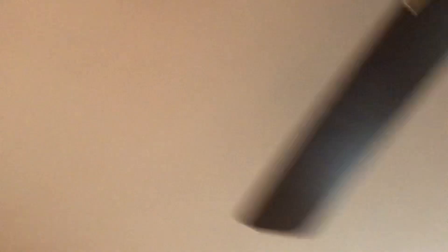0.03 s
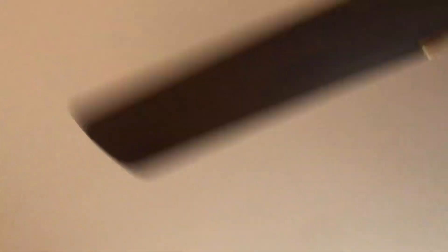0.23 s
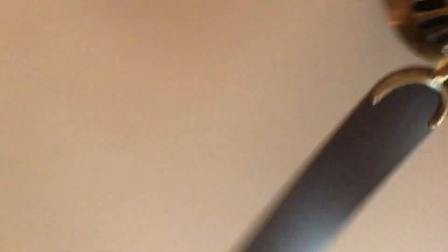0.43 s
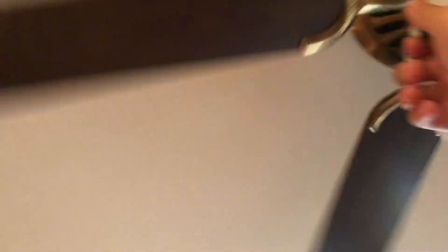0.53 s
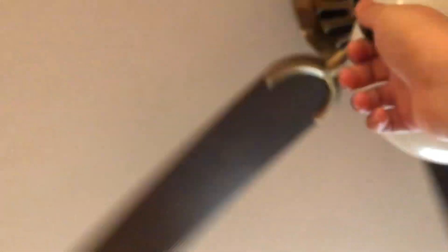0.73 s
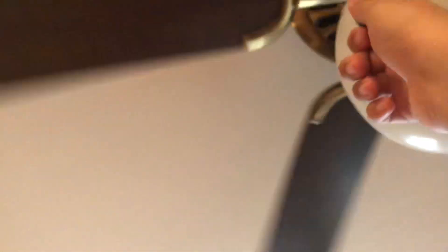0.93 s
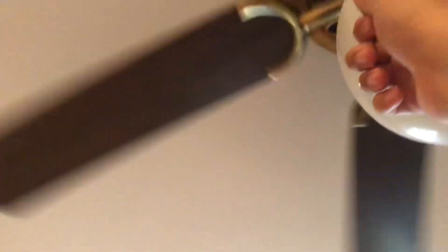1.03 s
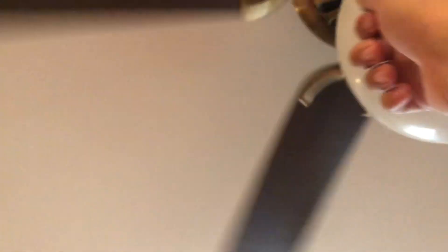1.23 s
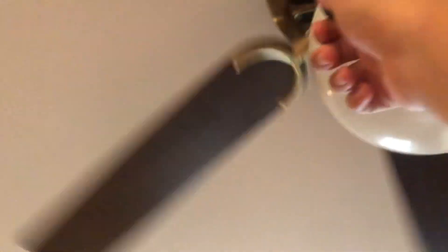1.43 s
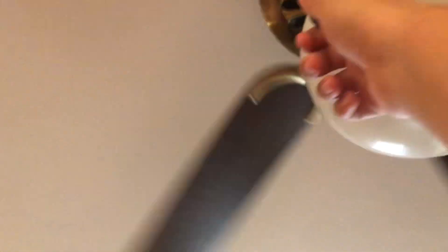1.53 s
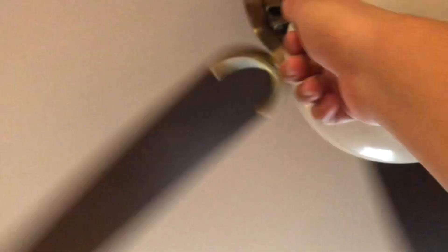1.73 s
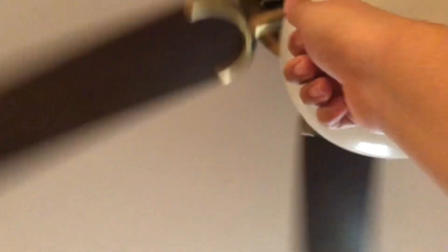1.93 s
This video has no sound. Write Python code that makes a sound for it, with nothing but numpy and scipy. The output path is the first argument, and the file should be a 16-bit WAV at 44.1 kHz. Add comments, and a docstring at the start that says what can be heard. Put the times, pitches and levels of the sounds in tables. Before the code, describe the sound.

Sharp, uneven clicks and ticks from a ceiling fan's glass shade, with a low hum.

```python
"""A small room: a ceiling fan turns while a hand holds its glass light bowl.
The bowl shifts in its metal fitting: sharp, chattering clicks ring glass and housing,
with light ticks and brief scrapes between them, each with a short room tail.
The motor hums over a low rush of air."""
import sys
import numpy as np
from scipy import signal
from scipy.fft import rfft, irfft, next_fast_len
from scipy.io import wavfile
from scipy.ndimage import map_coordinates

SR = 44100
rng = np.random.default_rng(int(sys.argv[2]) if len(sys.argv) > 2 else 0)


def int16_out(signal):
    """Quantize to a 16-bit WAV file."""
    q = np.round(np.clip(np.atleast_2d(signal).T, -1, 1) * 32767)
    wavfile.write(sys.argv[1], SR, q.astype(np.int16))


N = 88200

# Bowl slips: t/s, chatter/s, contact f/Hz, contact level/dB re snap, 8 x relative band energy/dB
BOWL_SLIPS = [(0.246, 0.0013, 8080, -3.5, -61.5, -71, -67, -62, -57.5, -64, -61.5, -60),
              (0.4716, 0.0021, 9480, -10.5, -72.5, -79, -75, -68, -70.5, -65.5, -72, -65.5),
              (0.6014, 0.0024, 2070, -5.5, -62.5, -66.5, -52.5, -55, -55.5, -59.5, -62.5, -65.5),
              (1.0684, 0.0005, 7320, -8.5, -69.5, -77.5, -69.5, -67.5, -64, -68.5, -67.5, -70),
              (1.3708, 0.0045, 14600, -11, -71, -74, -76.5, -68, -73, -64.5, -70.5, -61),
              (1.5804, 0.0032, 6700, -23, -60.5, -67, -62.5, -58.5, -57.5, -58, -64, -64)]
def clicks(gain_db=-3, contact_t60_s=0.016):
    """The bowl slips in its fitting; each point of contact has a brief pitch of its own."""
    out = np.zeros(N)
    for start_s, chatter_s, hz, contact_db, *band_db in BOWL_SLIPS:
        click = snap(band_db, chatter_s)
        contact = pulse(np.sin(2 * np.pi * hz * T) * ATTACK * amp(-60 * T / contact_t60_s))
        contact = in_room(contact, send=0.3)
        add(out, start_s, click + amp(contact_db) * np.linalg.norm(click) * contact)
    return amp(gain_db) * out


# Light contacts: t/s, room send/dB, 8 x relative band energy/dB
LIGHT_CONTACTS = [ (.059, 0, -82, -88, -86, -80, -83, -79, -77, -78),
                  (.128, -3, -91, -80, -93, -99, -96, -95, -98, -99),
                  (.173, 0, -81, -89, -83, -82, -85, -88, -92, -89),
                  (.395, -3, -95, -86, -90, -100, -98, -98, -102, -105),
                  (.535, 0, -85, -84, -85, -79, -76, -75, -81, -78),
                  (.821, 0, -90, -93, -90, -85, -90, -91, -89, -86),
                  (.849, 0, -76, -86, -81, -76, -80, -76, -75, -75),
                  (.947, 0, -76, -88, -80, -77, -79, -75, -75, -71),
                  (1.004, -3, -89, -81, -96, -105, -104, -101, -103, -99),
                  (1.1517, -7, -86, -75, -74, -95, -93, -88, -92, -93),
                  (1.338, 0, -80, -79, -88, -85, -87, -95, -99, -97),
                  (1.422, 0, -83, -85, -85, -78, -78, -74, -80, -73),
                  (1.834, 0, -76, -82, -84, -79, -83, -77, -76, -77),
                  (1.9275, 0, -77, -82, -78, -83, -79, -75, -78, -73)]
def ticks(gain_db=-2):
    """Lighter contacts of bowl and fitting."""
    out = np.zeros(N)
    for start_s, send_db, *band_db in LIGHT_CONTACTS:
        add(out, start_s, snap(band_db, chatter_s=0.0014, send_db=send_db))
    return amp(gain_db) * out


# Modes of glass bowl with fitting, and of housing: f/Hz, relative level/dB, T60/s
BOWL_MODES = [(1035, -14, .4), (1567, -8, .18), (2051, -4, .17), (2700, -5, .16), (2864, -2, .18),
              (3295, -4, .16), (3424, -5, .15), (3591, -2, .15), (3790, -3, .13), (4829, -8, .13),
              (5500, -6, .11), (6900, -7, .11), (8140, -6, .07), (10050, -11, .1), (14600, -9, .08)]
HOUSING_MODES = [(253, -2, .14), (343, 1, .19), (385, -6, .08), (432, -2, .15), (590, -17, .13)]
# Room tail EQ: f/Hz, gain/dB
TAIL_EQ = [(200, -14), (1000, 1), (3000, -1), (8000, -1), (15000, 0)]
# Edges of the 8 bands: f/Hz
BAND_EDGES_HZ = [200, 700, 1700, 3100, 4200, 7000, 11000, 13500, 16000]
def snap(band_db, chatter_s, send_db=0, uneven_db=4, release_t60_s=0.013, housing_rise_s=0.005):
    """Chattering contact rings bowl and housing; the room answers in the bowl's colour."""
    slips = rng.standard_normal(len(T)) * amp(uneven_db * rng.standard_normal(len(T)))
    release = amp(-60 * np.maximum(T - chatter_s, 0) / release_t60_s)
    chatter = pulse(slips * ATTACK * release)
    bowl = amp(-10.5) * pulse(ring(BOWL_MODES) * ATTACK)
    housing = amp(11.5) * pulse(ring(HOUSING_MODES) * (1 - np.exp(-T / housing_rise_s)))
    direct = in_bands(chatter + bowl + housing, band_db)
    tail_db = band_db + along(TAIL_EQ, np.array(BAND_EDGES_HZ[1:]))
    tail = in_bands(filtered(room_tail(), bowl_response), tail_db)
    return direct + amp(ROOM_DB + send_db) * tail


def bowl_response(f, lift=2.6, relative_width=0.017):
    """Gain at f: one resonance peak per bowl mode."""
    return 1 + lift * sum(amp(db) / (1 + ((f / hz - 1) / relative_width) ** 2)
                          for hz, db, _ in BOWL_MODES)


def ring(modes, scatter_db=1.5, rattle_per_s=161.5):
    """Decaying modes, struck differently each time; the loose seat roughens their phase."""
    t = T[:SR // 4]
    out = np.zeros(len(T))
    for hz, db, t60_s in modes:
        decay = amp(db + rng.normal(0, scatter_db) - 60 * t / t60_s)
        phase = 2 * np.pi * (hz * t + rng.random())
        rattle_rad = 0.63 * np.sqrt(hz / 3000) * wobble(rattle_per_s, len(t))
        out[:len(t)] += decay * np.sin(phase + rattle_rad)
    return out


# Rim strokes: t/s, length/s, level/dB
RIM_STROKES = [(0.016, 0.041, -54), (0.122, 0.077, -64), (0.152, .035, -58), (.226, 0.025, -61.5),
               (0.437, 0.06, -64.5), (.52, 0.045, -64), (0.801, 0.036, -63), (0.93, 0.024, -53.5),
               (0.962, 0.011, -67), (1.055, 0.055, -53), (1.33, 0.072, -62), (1.41, .025, -58.5),
               (1.799, 0.027, -59), (1.854, 0.14, -64), (1.915, 0.024, -54.5)]
# Friction spectrum: f/Hz, relative level/dB
RUB_SPECTRUM = [(150, -28), (400, 13.5), (900, -11.5), (2000, -7.5), (3600, -6), (5500, -9), (8000, -5),
                (11000, -2.5), (15000, -4.5)]
def scrapes(slips_per_s=1500):
    """The rim rubs in the fitting: a dense run of tiny slips that swells and fades."""
    out = np.zeros(N)
    for start_s, length_s, db in RIM_STROKES:
        slips = rng.standard_normal(len(T)) * (rng.random(len(T)) < slips_per_s / SR)
        rub = unit(filtered(slips, lambda f: amp(along(RUB_SPECTRUM, f))))
        stroke = np.abs(np.sin(np.pi * np.minimum(T / length_s, 1))) ** 0.7
        add(out, start_s, in_room(amp(db) * rub * stroke))
    return out


# Motor lines: f/Hz, base level/dB
HUM_LINES = [(120.5, -67.5), (243, -71.5)]
# Hum swell: t/s, relative level/dB
HUM_SWELL = [(0, 7), (.12, -1), (.28, 5.5), (.5, -3.5), (.78, -6.5), (1, 2.5), (1.22, 4), (1.45, 6),
             (1.6, -2), (1.8, 4), (2, 3)]
def motor(waver_db=3, drift_rad=0.65):
    """Mains hum that swells and wavers."""
    t = np.arange(N) / SR
    knot_s, knot_db = np.transpose(HUM_SWELL)
    swell_db = np.interp(t, knot_s, knot_db - knot_db.mean())
    out = np.zeros(N)
    for hz, db in HUM_LINES:
        rms = amp(db + swell_db + waver_db * wobble(12.13))
        out += rms * np.sqrt(2) * np.sin(2 * np.pi * hz * t + drift_rad * wobble(9.7))
    return out


# Air spectrum: f/Hz, relative level/dB
AIR_SPECTRUM = [(20, -31), (35, -22), (55, 8.5), (80, 0), (130, 7.5), (200, 2), (400, 0), (650, -9),
                (1200, -12.5), (2500, -16), (5000, -20), (10000, -22), (16000, -24)]
def air(level_db=-63.5, flutter_db=2, flutter_below_hz=900):
    """Steady room noise; its low part flutters in the draught of the blades."""
    noise = unit(filtered(rng.standard_normal(N), lambda f: amp(along(AIR_SPECTRUM, f))))
    low = filtered(noise, lambda f: 1 / (1 + (f / flutter_below_hz) ** 2))
    flutter = amp(flutter_db * wobble(19.1)) - 1
    return amp(level_db) * (noise + low * flutter)


# Room decay: f/Hz, T60/s
ROOM_DECAY = [(200, 0.11), (1000, 0.28), (3000, 0.25), (7000, 0.19), (15000, 0.16)]
ROOM_DB = -1.5
def room_tail(rise_s=0.0017):
    """Diffuse room response, energy 1; the mids ring longest."""
    hz, t, spectra = signal.stft(rng.standard_normal(len(T)), SR, nperseg=256)
    decay = amp(-60 * t / along(ROOM_DECAY, hz)[:, None])
    tail = signal.istft(spectra * decay, SR, nperseg=256)[1][:len(T)]
    return pulse(tail * np.minimum(T / rise_s, 1) ** 2)


def in_room(x, send=1):
    """A short sound plus its reverberation."""
    return x + send * amp(ROOM_DB) * signal.fftconvolve(x, room_tail())[:len(T)]


T = np.arange(SR // 2) / SR  # time within one event, s
ATTACK = np.minimum(T / 0.00081, 1)  # contact onset ramp


def in_bands(x, band_db):
    """Set the energy of each band of x."""
    bands = [signal.butter(4, edges_hz, "band", fs=SR, output="sos")
             for edges_hz in zip(BAND_EDGES_HZ, BAND_EDGES_HZ[1:])]
    return np.sqrt(SR) * sum(amp(db) * pulse(signal.sosfilt(sos, x)) for sos, db in zip(bands, band_db))


def amp(db):
    """dB to gain."""
    return 10 ** (np.asarray(db) / 20)


def unit(x):
    """Scale to rms 1."""
    return x / np.sqrt(np.mean(x ** 2) + 1e-20)


def pulse(x):
    """Scale to energy 1."""
    return x / (np.linalg.norm(x) + 1e-12)


def along(points, hz):
    """Interpolate (f/Hz, value) points over log frequency."""
    knot_hz, values = np.transpose(points)
    return np.interp(np.log(hz + 1), np.log(knot_hz + 1), values)


def filtered(x, response):
    """Zero-phase filter with gain response(f/Hz)."""
    size = next_fast_len(len(x) + 8192)
    return irfft(rfft(x, size) * response(np.fft.rfftfreq(size, 1 / SR)), size)[:len(x)]


def wobble(knots_per_s, size=N):
    """Smooth random curve."""
    position = np.arange(size) * knots_per_s / SR
    return map_coordinates(rng.standard_normal(256), [position], order=2, mode="wrap")


def add(track, start_s, x):
    """Mix x into track at start_s."""
    part = track[max(round(start_s * SR), 0):][:len(x)]
    part += x[:len(part)]


def scene():
    """Bowl noises over motor and air, mono."""
    return (clicks() + ticks() + scrapes() + motor() + air())[None]


def record(dry):
    """Steep low-pass."""
    cutoff_hz = 16200
    return np.array([filtered(x, lambda hz: 1 / (1 + (hz / cutoff_hz) ** 160)) for x in dry])


dry = scene()
out = record(dry)
int16_out(out)
```